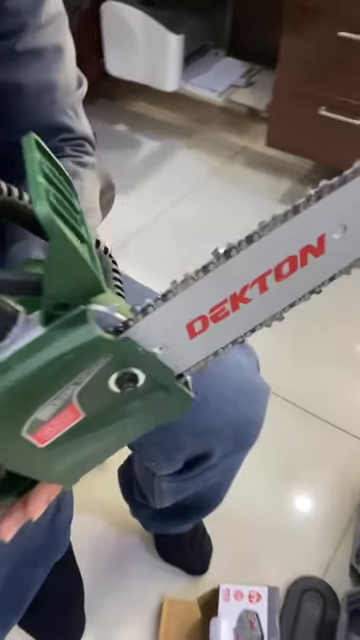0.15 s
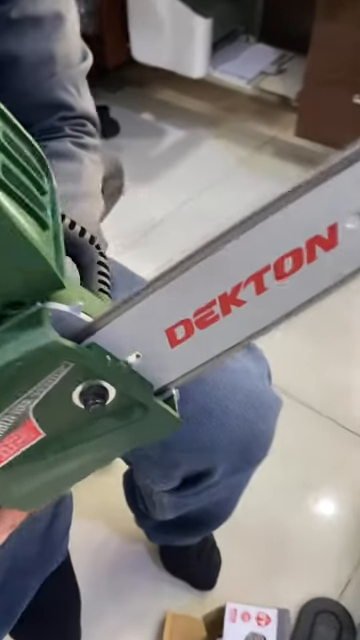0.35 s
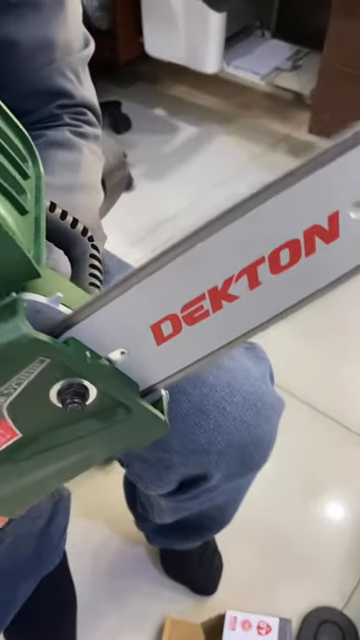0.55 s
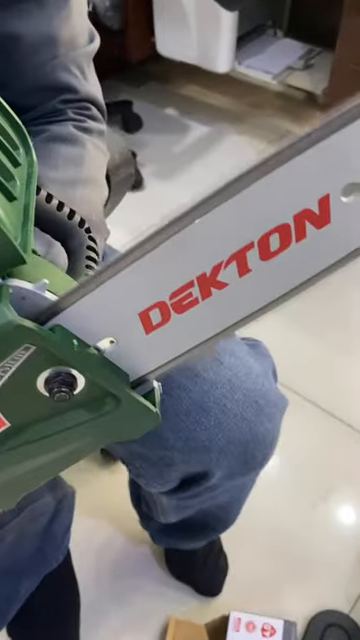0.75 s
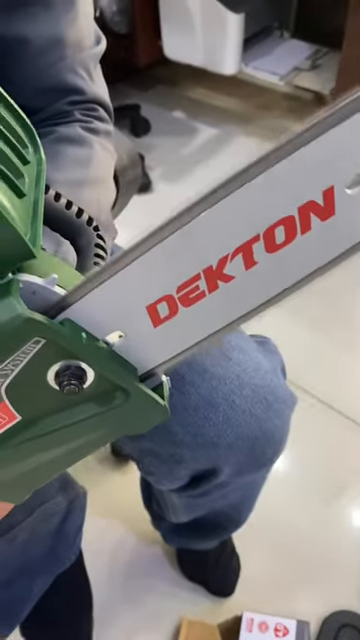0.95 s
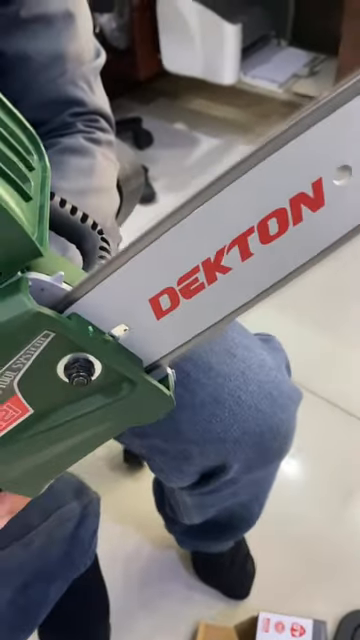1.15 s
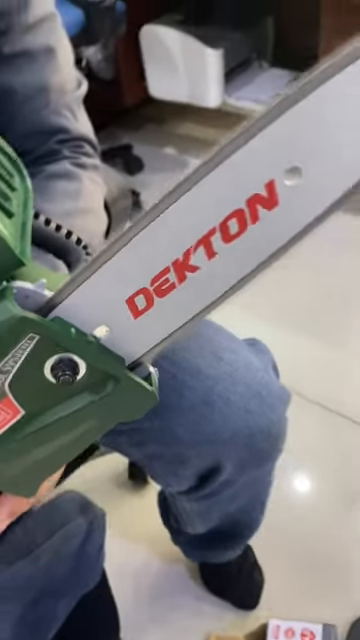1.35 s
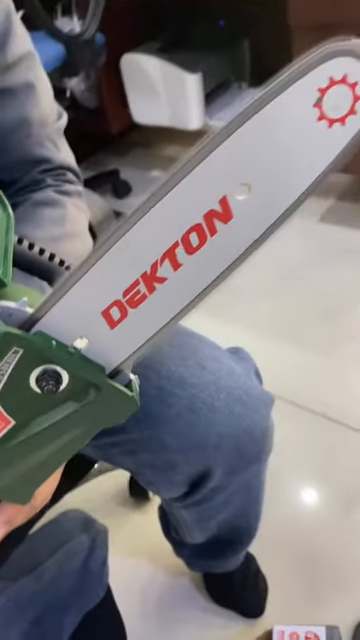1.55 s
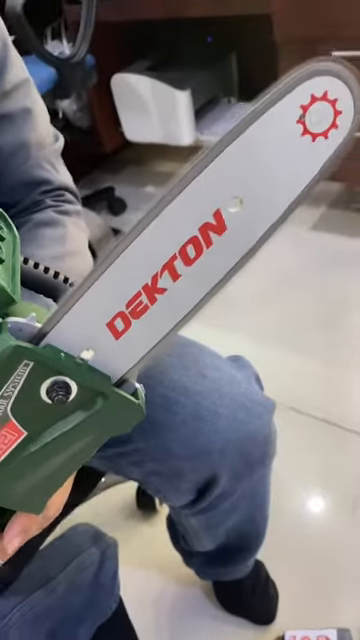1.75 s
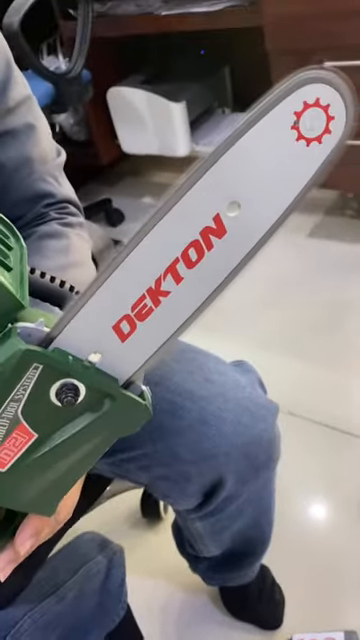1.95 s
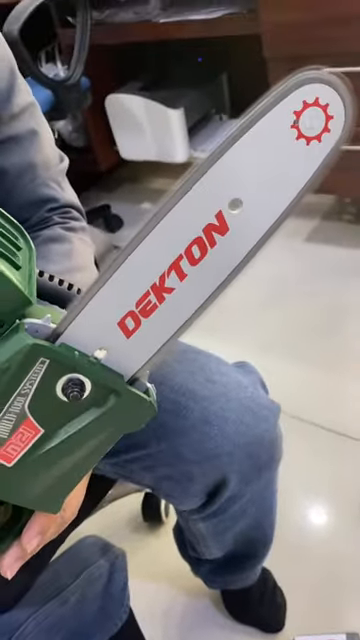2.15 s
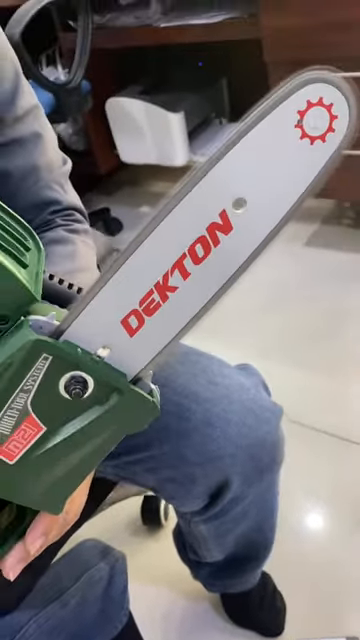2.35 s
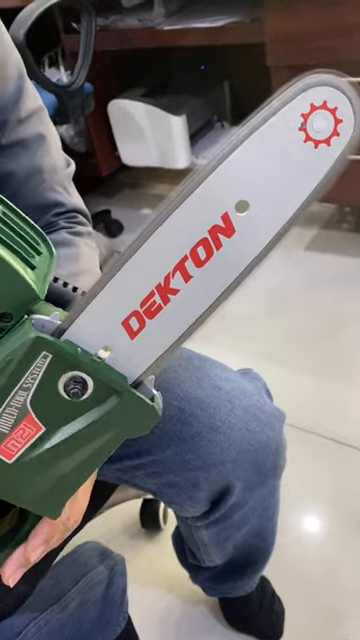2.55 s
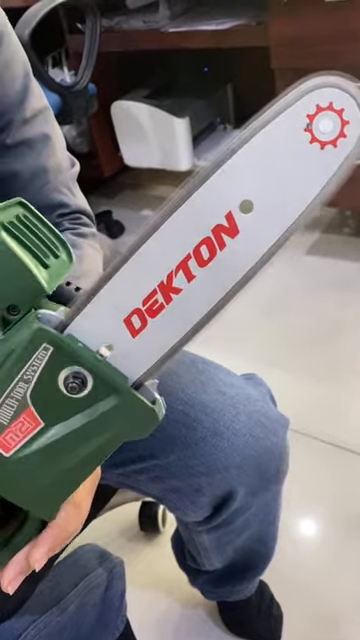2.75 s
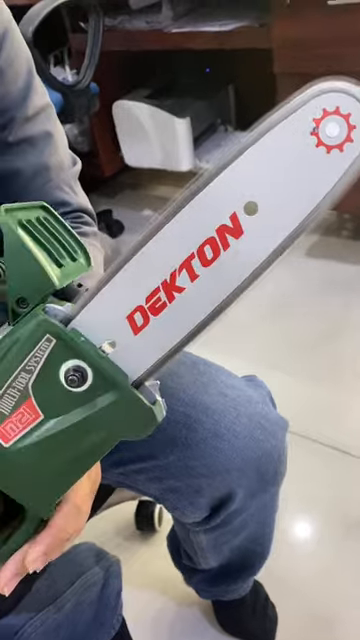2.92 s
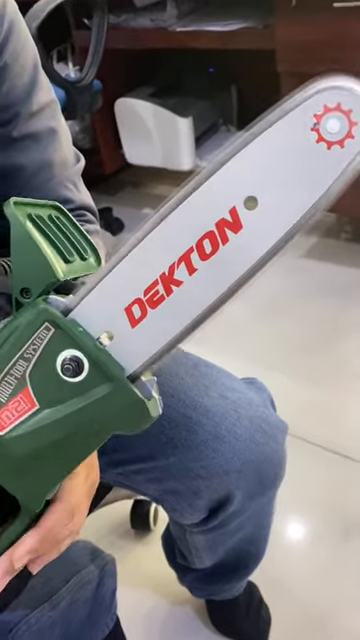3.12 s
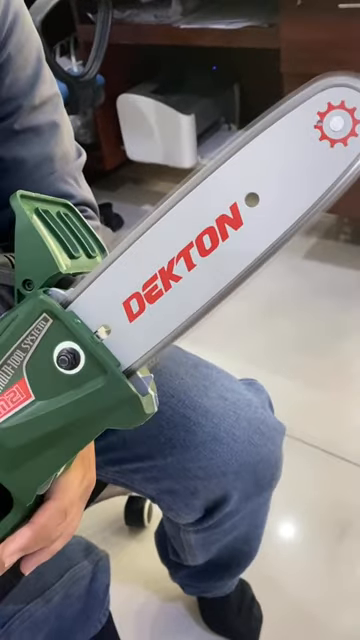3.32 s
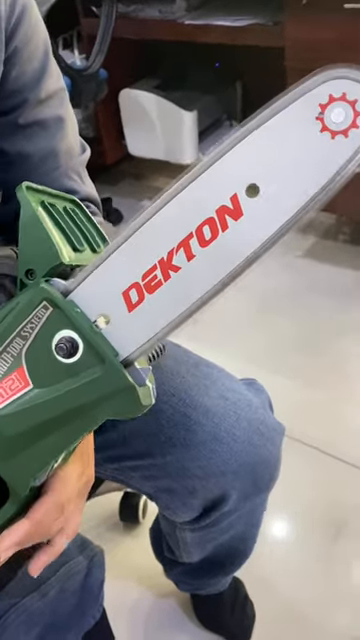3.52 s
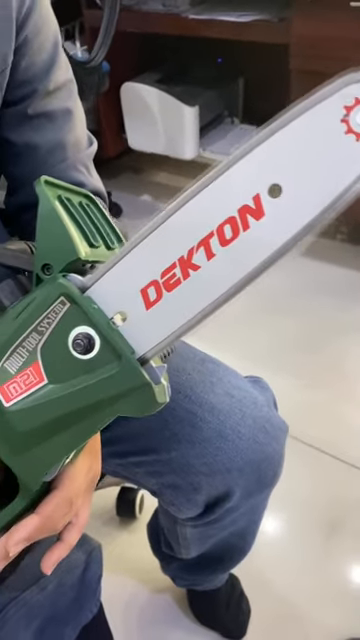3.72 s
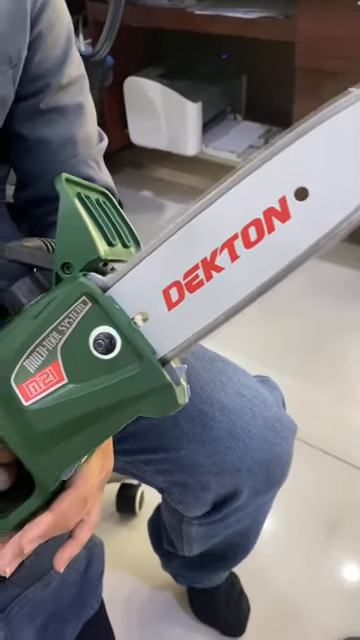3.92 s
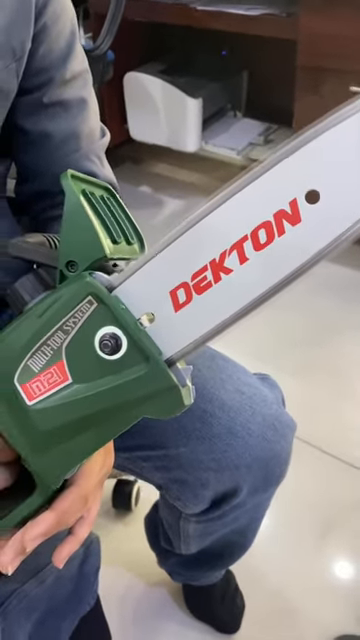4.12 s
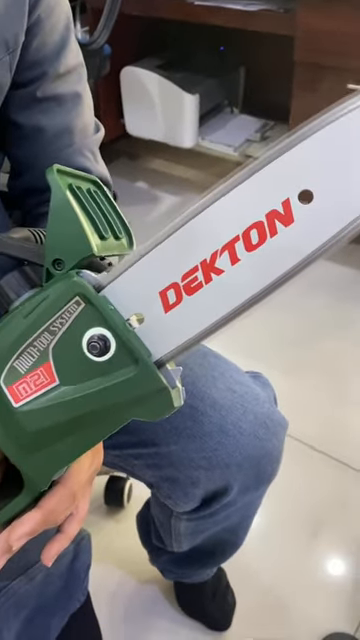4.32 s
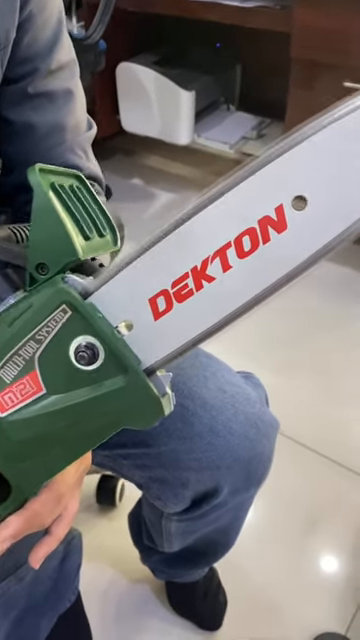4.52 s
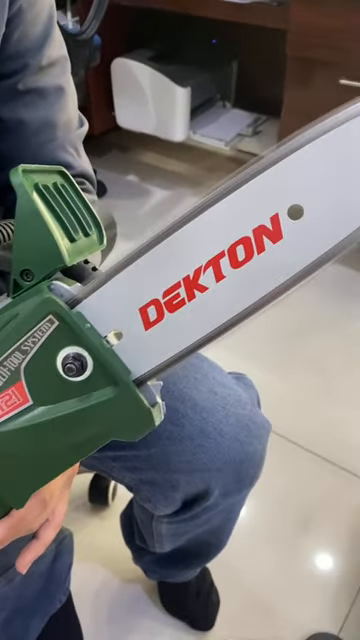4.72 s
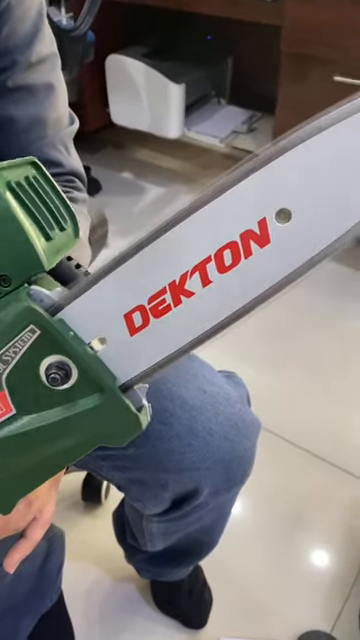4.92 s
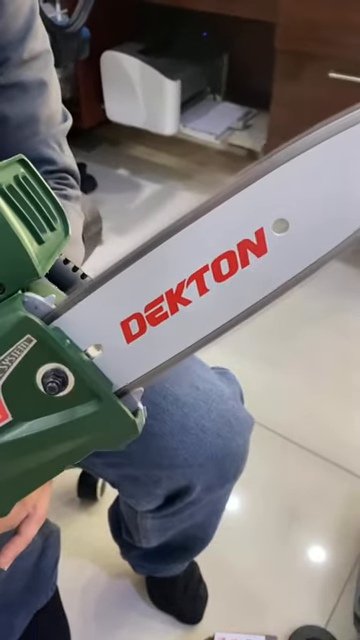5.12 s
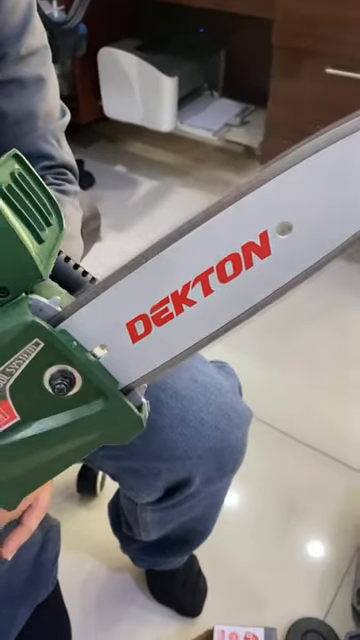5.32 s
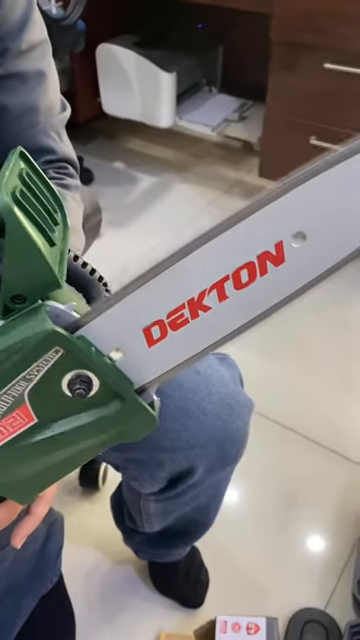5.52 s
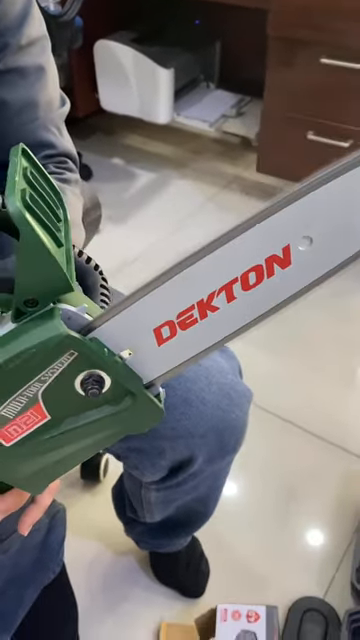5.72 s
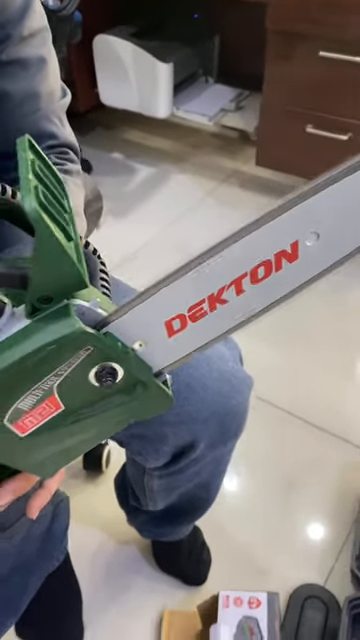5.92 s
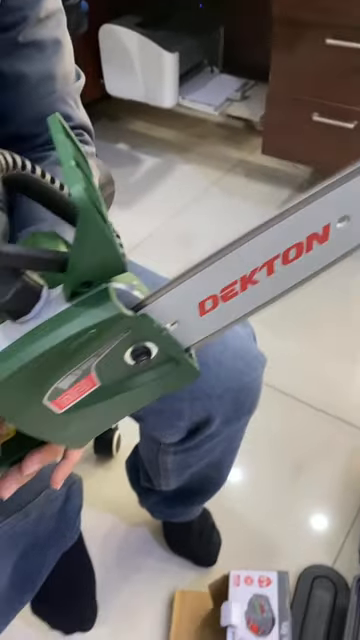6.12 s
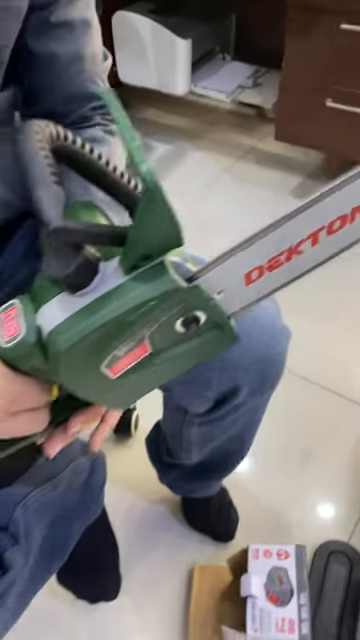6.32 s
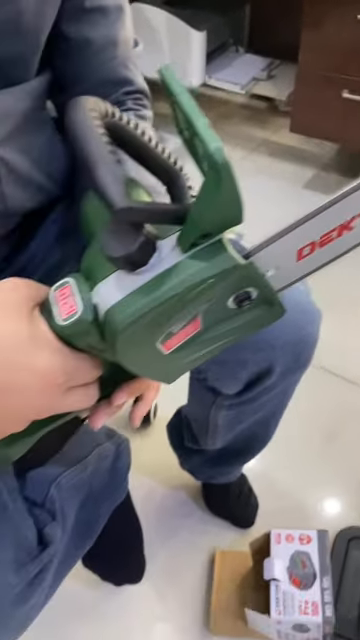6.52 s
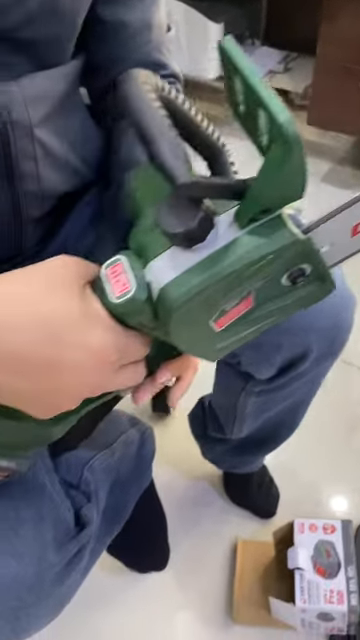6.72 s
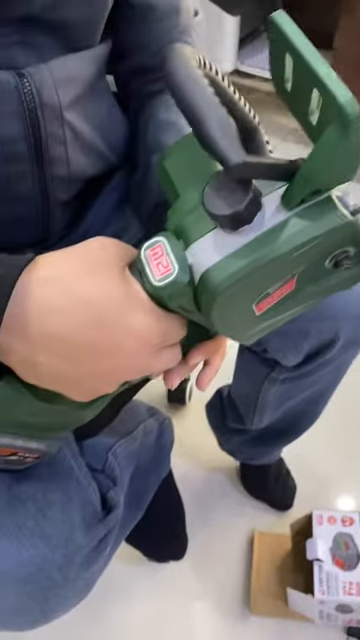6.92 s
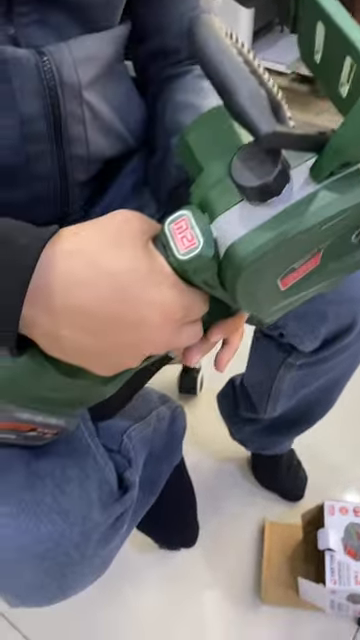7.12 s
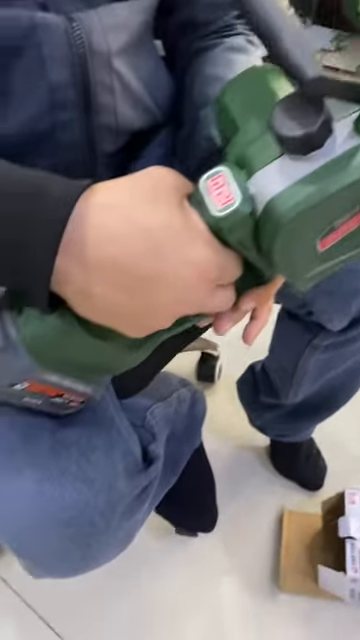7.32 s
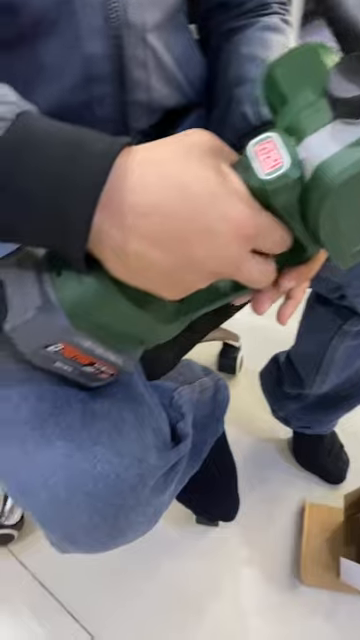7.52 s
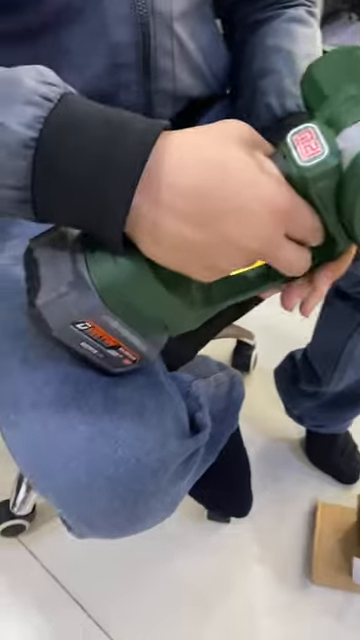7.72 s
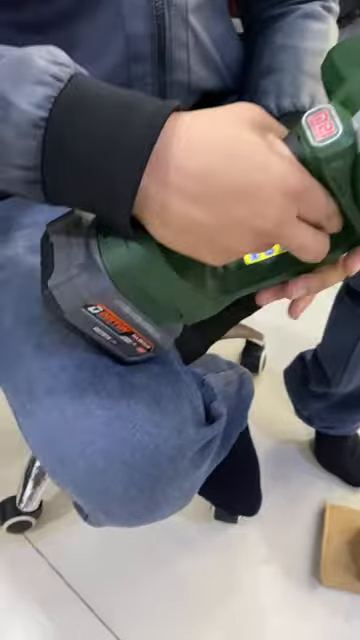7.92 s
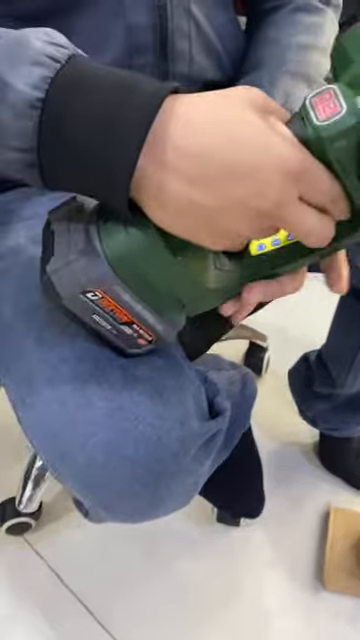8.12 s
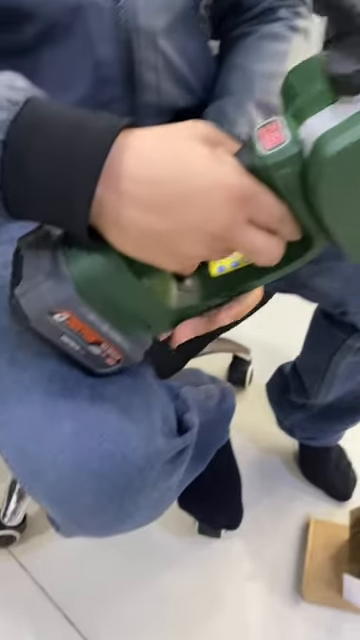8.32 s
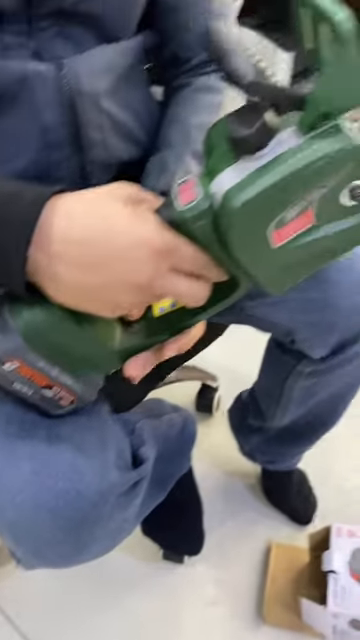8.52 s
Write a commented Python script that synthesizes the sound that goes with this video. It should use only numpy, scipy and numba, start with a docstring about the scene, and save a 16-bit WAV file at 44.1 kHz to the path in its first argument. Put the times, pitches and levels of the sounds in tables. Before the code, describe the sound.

Close metallic chain clatter and motor whine race up, hold steady for several seconds, turn more motor-heavy, then cut off almost instantly into room echo.

```python
"""A cordless chainsaw runs unloaded close to a phone in a small office: chain clatter, bar ring and hiss.
One shaft speed drives filtered clicks, moving resonances and shaft-locked tones for chain, bar and motor.
The trigger clicks, the gears knock and the motor winds up; the saw is turned motor first, then braked.
Echoes and room rumble surround it; the phone ducks the long loud run and cuts the top."""
import sys
import numpy as np
from scipy import signal
from scipy.fft import rfft, irfft
from scipy.io import wavfile
from scipy.ndimage import uniform_filter1d
from numba import njit

SR = 44100
rng = np.random.default_rng(int(sys.argv[2]) if len(sys.argv) > 2 else 0)


def int16_out(signal):
    """Quantize to a 16-bit WAV file."""
    q = np.round(np.clip(np.atleast_2d(signal).T, -1, 1) * 32767)
    wavfile.write(sys.argv[1], SR, q.astype(np.int16))


N = 377496
T = np.arange(N) / SR
SIZE = 8192  # filter length in samples
FREQ = np.arange(SIZE // 2 + 1) * SR / SIZE

# Response of the sprocket cover. Each row: frequency [Hz], gain [dB].
COVER_RESPONSE = [(100, -47.5), (300, -21), (500, -33.5), (800, -23.5), (1020, -22), (1150, 0.5),
                  (1350, -2), (1800, -6.5), (2300, -9), (3000, -9), (5500, -14), (9000, -26)]

# sprocket drive: start, ramp, full speed; brake
START_S, RAMP_TURNS_PER_S2, FULL_TURNS_PER_S = .221, 137, 78
BRAKE_S, BRAKE_TURNS_PER_S2 = 7.5, 850
GEAR_RATIO = 60 / 13  # motor turns per sprocket turn
SWING_START_S, SWING_END_S = 5.32, 7.22  # motor swung towards the phone


def undb(db):
    """Decibels to gain."""
    return np.exp(np.asarray(db) * (np.log(10) / 20))


def spectrum(table):
    """Join a (Hz, dB) table on a log-frequency axis."""
    hz, db = np.transpose(table)
    return np.interp(np.log(FREQ + 1), np.log(hz), db)


def colour(x, db):
    """Minimum-phase filter with the given dB response, so that clicks ring after they strike."""
    cepstrum = irfft(np.log(undb(db)), SIZE)
    cepstrum[1:SIZE // 2] *= 2
    cepstrum[SIZE // 2 + 1:] = 0
    response = irfft(np.exp(rfft(cepstrum)), SIZE)
    return signal.oaconvolve(x.astype(np.float32), response.astype(np.float32))[:N]


def unit(x):
    """Scale to rms 1."""
    return x / np.sqrt(np.mean(x ** 2))


def walk(rate_hz):
    """Random curve of rms 1 through rate_hz new points a second."""
    points = rng.standard_normal(1024)
    return unit(np.interp(T * rate_hz, np.arange(len(points)), points))


def ease(start_s, end_s):
    """Smooth move from 0 to 1."""
    return np.sin(np.pi / 2 * np.clip((T - start_s) / (end_s - start_s), 0, 1)) ** 2


def swell(at_s, width_s):
    """Smooth rise to 1 and fall back."""
    return np.exp(-((T - at_s) / width_s) ** 2)


def strikes(turns, count, scatter_db, late_s):
    """Clicks, count a turn, each with random size and timing offset."""
    at = np.flatnonzero(np.diff(np.floor(turns * count)))
    chance = rng.standard_normal((len(at), 2))
    offset = (late_s * SR * chance[:, 1]).astype(int)
    at = np.clip(at + offset, 0, N - 1)
    return unit(np.bincount(at, undb(scatter_db * chance[:, 0]), N))


def grit(rate_hz, scatter_db):
    """Dense tiny random clicks of either sign, rate_hz a second."""
    at = np.flatnonzero(rng.random(N) < rate_hz / SR)
    sign, size = rng.standard_normal((2, N), dtype=np.float32)[:, at]
    return unit(np.bincount(at, sign * undb(scatter_db * size), N))


def tones(turns, table, waver_db, waver_hz):
    """Lines locked to a shaft, each (multiple, dB) wavering on its own."""
    angle = (2 * np.pi * (turns - np.floor(turns))).astype(np.float32)
    times_s, out = np.arange(512) / waver_hz, np.zeros(N)
    for multiple, db in table:
        points = undb(db + waver_db * rng.standard_normal(len(times_s)))
        level = np.interp(T, times_s, points)
        out += level * np.sin(round(multiple) * angle + 2 * np.pi * rng.random())
    return np.sqrt(2) * out


@njit
def band(x, hz, width_hz):
    """Band-pass whose centre may move, gain 1 at the centre."""
    y, b, low = np.empty(len(x)), 0., 0.
    for i in range(len(x)):
        g, k = np.tan(np.pi * hz[i] / SR), width_hz / hz[i]
        v = (b + g * (x[i] + 1e-18 - low)) / (1 + g * (g + k))
        b, low, y[i] = 2 * v - b, low + 2 * g * v, k * v
    return y


def emphasise(x, hz, width_hz, db):
    """Lift or sink one band; its centre and gain may move."""
    return x + (undb(db) - 1) * band(x.astype(float), hz + np.zeros(N), float(width_hz))


def resonances(table):
    """dB response of (Hz, width Hz, dB) resonances, summed in power."""
    power = 0
    for hz, width_hz, db in table:
        damping = (FREQ * width_hz) ** 2
        power = power + undb(db) ** 2 * damping / (damping + (FREQ ** 2 - hz ** 2) ** 2)
    return 10 * np.log10(power + 1e-6)


def rumble(side_hz):
    """Room noise plus a handling swell as the saw kicks; alike at both ports in the bass."""
    # Each row: frequency [Hz], relative level [dB].
    rumble_response = [(25, -49), (36, -30.5), (46, -4.5), (65, -2.5), (115, 1), (160, -11), (200, -4.5),
                       (260, -19), (500, -17.5), (1000, -28.5), (2500, -40.5), (5500, -53.5), (8000, -67),
                       (15000, -68)]
    db = spectrum(rumble_response)
    mid = colour(rng.standard_normal(N), db)
    side = colour(rng.standard_normal(N), db + 20 * np.log10((FREQ + 1) / (FREQ + side_hz)))
    level_db = -44.5 + 8.5 * swell(at_s=.27, width_s=.23) + .51 * walk(17)
    return unit(mid + np.array([side, -side])) * undb(level_db)


def drive():
    """Sprocket turns/s for the synthesis: fading remains of an earlier burst, ramp, creep, brake."""
    # a slow, dying turn rate stands for the room tail of the earlier burst
    earlier_tail = 11 * np.exp(-np.minimum(T, START_S) / .16)
    running_s = np.maximum(T - START_S, 0)
    full = FULL_TURNS_PER_S - 1.6 * np.exp(-running_s / 1.6)
    drag = 1.05 * swell(at_s=.515, width_s=.07)  # whipping chain holds the ramp back
    driven = np.minimum(earlier_tail + RAMP_TURNS_PER_S2 * running_s - drag, full)
    return np.maximum(driven - BRAKE_TURNS_PER_S2 * np.maximum(T - BRAKE_S, 0), 0)


def torque(speed):
    """How hard the motor pulls and how hard it brakes, each 0-1, from the acceleration."""
    change = np.gradient(uniform_filter1d(speed, size=1024)) * SR
    return np.clip(change / RAMP_TURNS_PER_S2, 0, 1), np.clip(-change / BRAKE_TURNS_PER_S2, 0, 1)


def facing():
    """Levels in dB of cover, bar, hiss and hum as the saw is rolled over, back, and swung."""
    rolled = ease(1, 3.3) - ease(5.2, 5.3)
    swung = ease(SWING_START_S, SWING_END_S)
    # upright level plus changes on its side and motor first
    cover_db = -26.5 + .5 * rolled - 8.5 * swung
    bar_db = -28 - rolled - 14.5 * swung
    hiss_db = -21.5 - 2.5 * rolled + .25 * swung
    hum_db = -43.5 - 1.5 * rolled + 3 * swung
    return cover_db, bar_db, hiss_db, hum_db


def looseness(speed, pace, pull):
    """Rattle gain: pulled, the chain whips around one speed; otherwise it follows a power of speed."""
    crawl_turns_per_s, whip_turns_per_s, whip_width_turns_per_s = 11, 38.3, 17
    whip_db = 3.5 * np.exp(-((speed - whip_turns_per_s) / whip_width_turns_per_s) ** 2)
    pulled = np.tanh(speed / crawl_turns_per_s) * undb(whip_db)
    return pull * pulled + (1 - pull) * pace ** .81


def surge(turns, twice_db, once_db, flutter_db):
    """Gain as chain tension varies twice and once a sprocket turn and flaps at random."""
    twice = twice_db * np.cos(4 * np.pi * turns)
    once = once_db * np.cos(2 * np.pi * turns)
    return undb(twice + once + flutter_db * walk(45))


def cover_clatter(turns, pace):
    """Slack-chain slaps, links meeting six teeth and loose rivets rattle the cover."""
    slaps = np.sqrt(pace) * strikes(turns, count=2, scatter_db=.5, late_s=.0004)
    links = strikes(turns, count=6, scatter_db=2.5, late_s=.0004)
    rivets = grit(7000 * pace, scatter_db=0) * surge(turns, twice_db=3.5, once_db=.1, flutter_db=.6)
    clatter = undb(-4.5) * slaps + undb(-6.5) * links + rivets
    return unit(colour(clatter, spectrum(COVER_RESPONSE)))


def bar_ring(turns, pace):
    """Cutter knocks keep the steel bar ringing; each mode flares and wanders on its own."""
    # Each row: frequency [Hz], width [Hz], relative level [dB].
    bar_modes = [(2164, 61, -2), (2644, 115, 2.8), (3258, 90, 1), (3897, 230, -1.5), (6800, 1400, -1.5)]
    knocks = grit(4200 * pace, scatter_db=-.5)
    knocks = knocks * surge(turns, twice_db=-2, once_db=-1.1, flutter_db=.66)
    out = np.zeros(N)
    for k, (hz, width_hz, db) in enumerate(bar_modes):
        flare = undb(db + 1.8 * walk(22))
        mode = band(knocks, hz * (1 + .004 * walk(4)), float(width_hz))
        out += (-1) ** k * flare * mode
    return unit(out)


def bar_tones(turns, pace):
    """Higher chain tones radiated by the bar."""
    # Each row: multiple of the sprocket turn, level against the bar before its speed gain [dB].
    bar_lines = [(42, -18), (44, -17.5), (50, -17)]
    return pace ** 2 * tones(turns, bar_lines, waver_db=3, waver_hz=14)


def link_pings(pace):
    """Single cutters hit the rails and ring briefly, each at its own pitch; more at speed."""
    full_rate_hz, low_hz, high_hz, range_db, t60_s = 420, 1900, 12000, 14, .09
    t, out = T[:SR // 16], np.zeros(N + SR)
    for when, pitch, size, keep in rng.random((int(full_rate_hz * N / SR), 4)):
        at, hz = int(when * N), low_hz * (high_hz / low_hz) ** pitch
        if keep < pace[at]:
            decay = undb(range_db * size - 60 * t / t60_s)
            out[at:at + len(t)] += decay * np.sin(2 * np.pi * hz * t)
    return unit(out[:N])


def chain_hiss(turns, pace):
    """Links scrape along the groove in a stream of tiny ticks."""
    # Steel sliding in the groove. Each row: frequency [Hz], relative level [dB].
    hiss_response = [(300, -22), (900, -9), (1300, -4), (2200, 2.5), (3400, -8), (5300, 2), (6500, 4),
                     (7700, 6.5), (9000, 5.7), (11000, 4), (13000, 3.3), (15500, .5)]
    ticks = grit(26000 * pace, scatter_db=.5) * surge(turns, twice_db=.3, once_db=.5, flutter_db=.59)
    return unit(colour(ticks, spectrum(hiss_response)))


def sprocket_buzz(turns, pace, cover_db):
    """Chain running over the sprocket sounds through the cover; its upper tones come forward later."""
    # Each row: multiple of the sprocket turn, level before cover and speed gain [dB].
    sprocket_lines = [(5, -41), (7, -35.5), (8, -33.5), (9, -41), (11, -43.5), (12, -45), (13, -33.5),
                      (14, -38.5), (16, -45.5), (17, -45.5), (18, -47.5), (19, -42), (20, -45), (21, -42.5),
                      (22, -49.5), (23, -43.5), (24, -43)]
    lines = pace ** 2 * tones(turns, sprocket_lines, waver_db=1.3, waver_hz=6.3)
    buzz = colour(lines, spectrum(COVER_RESPONSE))
    buzz = emphasise(buzz, 1820, width_hz=200, db=5.5 * ease(3.4, 5.8))  # saw turned back
    return buzz * undb(.75 * (cover_db - cover_db.mean()) + 6)


def bar_drone(turns, pace):
    """The flat of the bar radiates one low chain tone that fades over the run."""
    steady = tones(turns, [(10, 0)], waver_db=.8, waver_hz=5)
    return undb(-41.5 - 8 * ease(START_S, START_S + 6.1)) * pace ** 3 * steady


def shaded(x):
    """Bands that sink while the saw is held at certain angles."""
    # Each row: time [s], duration width [s], frequency [Hz], band width [Hz], peak change [dB].
    hollows = [(3, 2.2, 2440, 70, -5.5), (3, 2, 2990, 110, -2.5), (6.6, .5, 3500, 600, -3)]
    for s, width_s, hz, width_hz, db in hollows:
        x = emphasise(x, hz, width_hz, db * swell(s, width_s))
    return x


def drifting(x):
    """A ring and a hollow drift through the treble as the saw is tilted."""
    # Each row: time [s], ring [Hz], ring gain [dB], hollow [Hz], hollow gain [dB].
    drift_path = [(.3, 4470, 3.5, 5000, 2), (1.1, 4560, 6.5, 4730, -9), (1.7, 4700, 7.5, 4710, -20),
                  (2.3, 4600, 0.5, 4400, 0.5), (3.3, 4640, 6.5, 4300, 2.5), (4.15, 4820, 7.5, 4350, -1.5),
                  (4.8, 4540, 6, 4430, 1.5), (5.3, 4736, 3.5, 4470, -4), (6, 4700, 2, 4340, 3)]
    s, *columns = np.transpose(drift_path)
    ring_hz, ring_db, hollow_hz, hollow_db = (np.interp(T, s, column) for column in columns)
    ringing = emphasise(x, ring_hz, width_hz=210, db=ring_db)
    return emphasise(ringing, hollow_hz, width_hz=240, db=hollow_db)


def motor(turns, pace, hum_db):
    """Hum, pinion whine and octave, eight-blade fan whistle and vent air, strongest near full speed."""
    # Each row: multiple of the motor turn, level against the hum [dB].
    motor_lines = [(1, -2.5), (2, -15), (6, -2.5), (16, -11)]
    # Vents pointing at the phone. Each row: time [s], width [s], peak gain [dB].
    vent_passes = [(4.95, .35, -40), (6.45, .3, -36.5)]
    hum = tones(turns, motor_lines, waver_db=1, waver_hz=6.4)
    air_db = 2 * resonances([(520, 480, -7.5), (2180, 490, 4)])
    air = unit(colour(rng.standard_normal(N), air_db))
    whistle, whine, octave = (tones(turns, [(k, 0)], waver_db=1.4, waver_hz=7) for k in (8, 13, 26))
    vents = sum(undb(db) * swell(s, width_s) for s, width_s, db in vent_passes)
    # whine peaks as full speed is reached
    whine_gain = undb(hum_db - 3) + undb(-45.5) * swell(at_s=.93, width_s=.3)
    octave_gain = undb(-6 + 6.5 * ease(6.75, 7.05))  # shrill with the motor nearest
    out = undb(hum_db) * (hum + undb(4) * air + octave_gain * octave)
    out = out + whine_gain * whine
    out = out + (undb(-47.5) + vents) * whistle + undb(-.5) * vents * air
    return pace ** 4 * out


def ring(modes, rise_s, crack_db, crack_s):
    """One blow: contact builds up, then a bright crack and the modes fade."""
    t = T[:SR // 5]
    hit = undb(crack_db) * rng.standard_normal(len(t)) * np.exp(-t / crack_s)
    for hz, db, t60_s in modes:
        hit = hit + undb(db - 60 * t / t60_s) * np.sin(2 * np.pi * hz * t)
    return hit * (1 - np.exp(-(t / rise_s) ** 2))


def blows():
    """The trigger ticks and the gears knock as they take up the load or brake."""
    # Each row: start [s], rise [s], switch gain [dB], housing gain [dB].
    blow_times = [(0.1985, .002, -13, -38), (0.2166, .001, -19, -10), (7.507, .0015, -16.5, -21)]
    # Modes of switch and housing. Each row: frequency [Hz], relative level [dB], t60 [s].
    switch_modes = [(2700, 0, 0.02), (2590, -13.5, 0.049), (4150, -11, .014), (5800, -7.5, .013)]
    housing_modes = [(1200, -6, 0.026), (1710, -15, 0.009), (2380, 1, 0.012), (3300, -18.5, .015),
                     (4600, -11, .008)]
    out = np.zeros(N)
    for s, rise_s, switch_db, housing_db in blow_times:
        switch = undb(switch_db) * ring(switch_modes, rise_s, crack_db=-22, crack_s=.003)
        housing = undb(housing_db) * ring(housing_modes, rise_s, crack_db=-13, crack_s=.004)
        hit = switch + housing
        out[int(s * SR):][:len(hit)] += hit
    return out


def strain(turns, pace, pull, brake):
    """Torque ripple sings through the housing on the ramp, and as a falling chirp under braking."""
    # Ripple on the ramp, then braking. Each row: multiple of the motor turn, level before gains [dB].
    strain_lines = [(4, -44), (6, -36), (8, -35), (10, -37), (12, -35.5), (16, -27.5)]
    brake_lines = [(4, -29.5), (8, -34)]
    rising = tones(turns, strain_lines, waver_db=2.5, waver_hz=40)
    rising = pull * np.minimum(pace / .47, 1) ** 4 * rising
    falling = (brake * pace) ** 2 * tones(turns, brake_lines, waver_db=1, waver_hz=40)
    housing_db = 2 * resonances([(1250, 410, .8), (2580, 800, 1.2)])
    return undb(-14) * falling + colour(rising + falling, housing_db)


def chain_slaps():
    """Sped up or stopped, the slack chain lashes the bar: short bursts of link hits."""
    # Each row: start [s], level [dB].
    slap_times = [(0.275, -32.5), (0.315, -23.5), (.366, -27.5), (.408, -20.5), (0.427, -25), (.524, -24),
                  (0.544, -20), (.669, -17.5), (7.529, -36), (7.558, -31)]
    # Each row: frequency [Hz], relative level [dB].
    slap_response = [(300, -33.5), (950, -29.5), (1200, 4.5), (2200, 2.5), (3500, -7), (7000, -9.5),
                     (15000, -28)]
    t, force = T[:SR // 10], np.zeros(N)
    for s, db in slap_times:
        force[int(s * SR):][:len(t)] += undb(db) * np.exp(-t / .013)
    return force * unit(colour(grit(5000, scatter_db=4.5), spectrum(slap_response)))


def draught(pace):
    """Cooling air so close, once the motor faces the phone, that the ports hear it in opposition."""
    # Each row: frequency [Hz], relative level [dB].
    draught_response = [(300, -25), (1850, -15), (2200, 1), (2900, -1), (3300, -4), (4400, -1), (5300, -8),
                        (15000, -25)]
    air = unit(colour(rng.standard_normal(N), spectrum(draught_response)))
    return undb(-32) * ease(SWING_START_S, SWING_END_S) * pace ** 2 * air


def saw():
    """One shaft speed drives every part; returns body, port spread and what the bar throws into the room."""
    speed = drive()
    pull, brake = torque(speed)
    pace = speed / speed.max()
    rattle = looseness(speed, pace, pull)
    cover_db, bar_db, hiss_db, hum_db = facing()
    turns = np.cumsum(speed * (1 + .0009 * walk(18))) / SR
    motor_turns = turns * GEAR_RATIO
    clatter = undb(cover_db) * cover_clatter(turns, pace)
    # the cover's low ring comes forward at the end of the swing
    clatter = emphasise(clatter, 1270, width_hz=100, db=8.5 * ease(6.8, 7.4))
    # the top and bottom runs of the chain knock independently
    top, bottom = (bar_ring(turns, pace) for _ in range(2))
    bar = undb(bar_db) * (top + bottom + bar_tones(turns, pace))
    pings = undb(-31.5 + (bar_db - bar_db.max()) / 2) * link_pings(pace)
    hiss = undb(hiss_db) * chain_hiss(turns, pace)
    chain = shaded(clatter + bar + pings + hiss)
    chain = chain + sprocket_buzz(turns, pace, cover_db) + bar_drone(turns, pace)
    body = rattle * drifting(chain + motor(motor_turns, pace, hum_db))
    body = body + blows() + strain(motor_turns, pace, pull, brake) + chain_slaps()
    spread = rattle * undb(bar_db - 3) * (top - bottom) + draught(pace)
    sideways = rattle * undb(-27) * top
    return body, spread, sideways


def ports(x):
    """The sound reaches the two microphone ports with different phase and level."""
    # Left-port lead. Each row: frequency [Hz], phase [radians].
    port_phase = [(0, 0), (2100, 0), (3000, 1), (4000, .6), (4500, .9), (5300, .2), (6500, 2.3),
                  (7100, 3.05), (8100, 3.3), (9800, 6.28), (11400, 6.45), (12600, 9.25), (14400, 9.7),
                  (15600, 12.4)]
    # Left minus right. Each row: frequency [Hz], level difference [dB].
    port_balance = [(100, -0.5), (350, -4.5), (750, 3.5), (1400, 3), (2000, 0), (2800, -3.5), (3800, 1),
                    (5000, 0)]
    phase = np.interp(FREQ, *np.transpose(port_phase))
    tilt = undb(spectrum(port_balance) / 2) * np.exp(.5j * phase)
    pair = np.roll(irfft(np.array([tilt, 1 / tilt]), SIZE), SIZE // 2, axis=1)
    return np.array([signal.oaconvolve(x, response)[SIZE // 2:][:N] for response in pair])


def reflections(x, t60_s, delay_s, dull_hz):
    """A fading, dulled spray of echoes, different at each port."""
    t = T[:SR]
    tail = rng.standard_normal((2, SR)) * undb(-60 * t / t60_s) * (t > delay_s)
    tail /= np.sqrt(np.sum(tail ** 2, axis=1, keepdims=True))
    tail = signal.sosfilt(signal.butter(1, min(dull_hz, .45 * SR), fs=SR, output="sos"), tail)
    return signal.fftconvolve(x[None], tail, axes=1)[:, :N]


def scene():
    """The saw close by, echoes off floor and desks, the office's tail and its rumble."""
    source, spread, sideways = saw()
    width = np.array([spread, -spread])
    near = undb(-28.5) * reflections(source, t60_s=.068, delay_s=.0027, dull_hz=7000)
    far = undb(-18.5) * reflections(source + sideways, t60_s=.68, delay_s=.012, dull_hz=11000)
    return ports(source) + width + near + far + rumble(side_hz=2200)


def gain_control(x, memory_s, patience, ramp, duck_db):
    """Turns down once most of the recent past has been loud, and back up when it no longer has."""
    loud = uniform_filter1d(np.mean(x ** 2, axis=0), size=2048) > undb(-28) ** 2
    loud_s = np.cumsum(loud) / SR
    share = (loud_s - np.interp(T - memory_s, T, loud_s)) / memory_s
    return x * undb(duck_db * np.clip((share - patience) / ramp + .5, 0, 1))


def record(dry):
    """The phone ducks a long loud sound and cuts the top."""
    ducked = gain_control(dry, memory_s=1.51, patience=.63, ramp=.19, duck_db=-5.5)
    return signal.sosfilt(signal.ellip(10, .2, 80, 15850, fs=SR, output="sos"), ducked)


dry = scene()
out = record(dry)
int16_out(out)
```